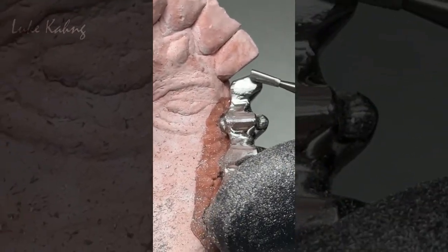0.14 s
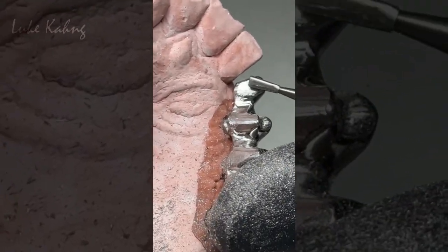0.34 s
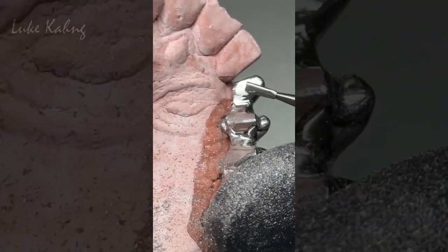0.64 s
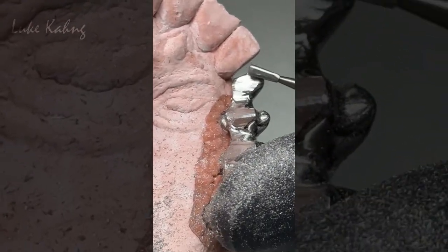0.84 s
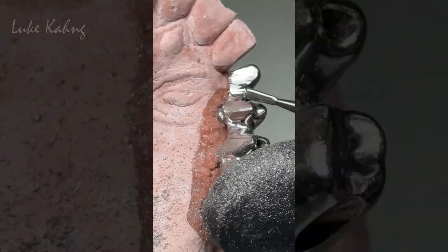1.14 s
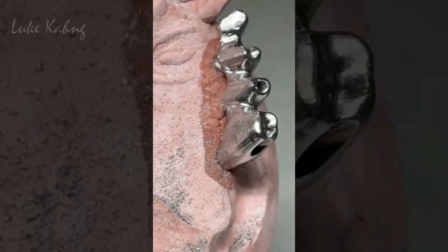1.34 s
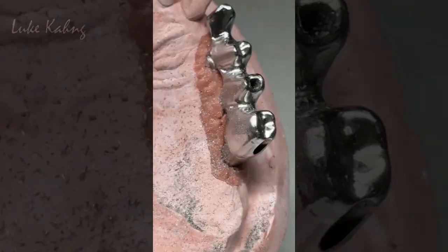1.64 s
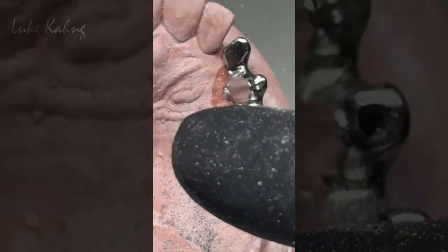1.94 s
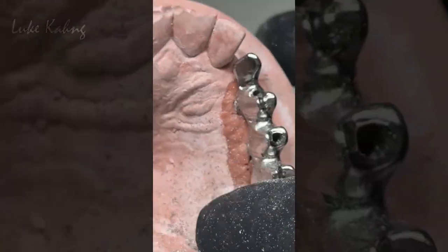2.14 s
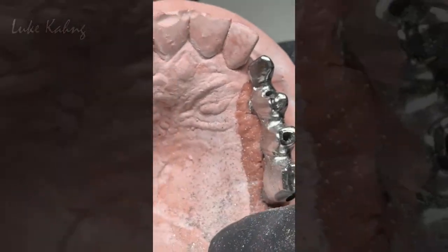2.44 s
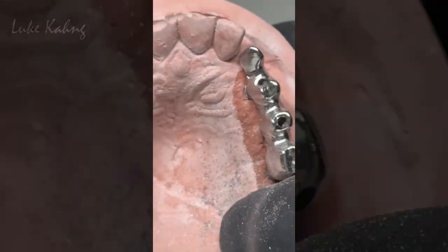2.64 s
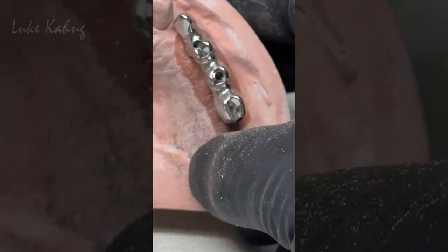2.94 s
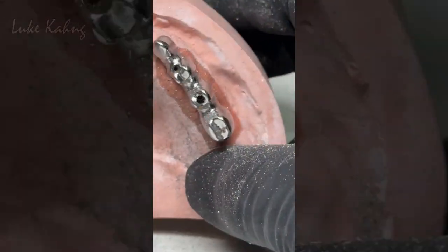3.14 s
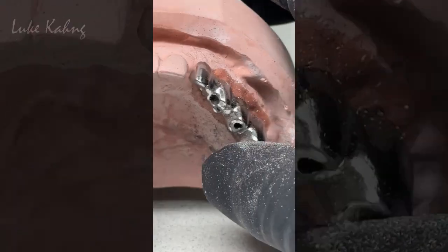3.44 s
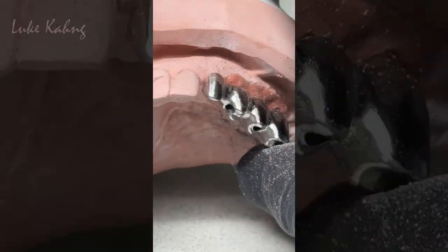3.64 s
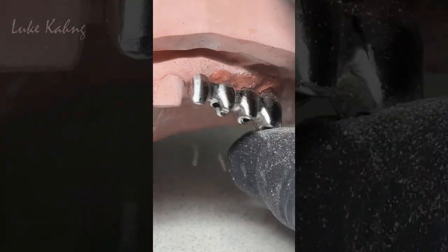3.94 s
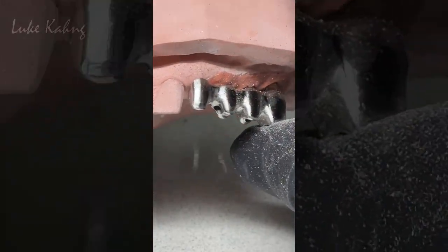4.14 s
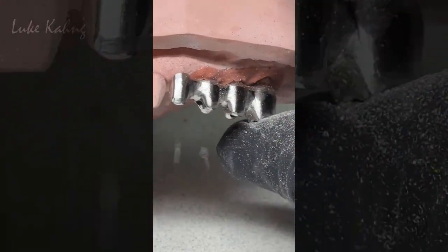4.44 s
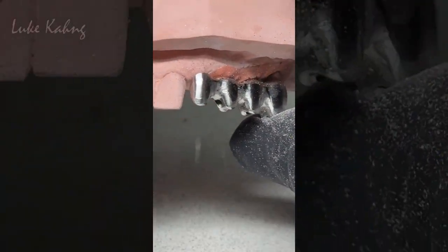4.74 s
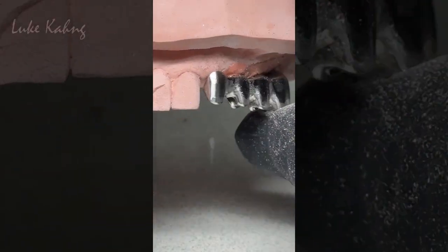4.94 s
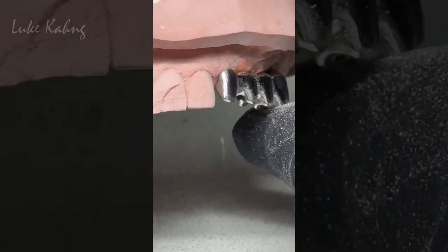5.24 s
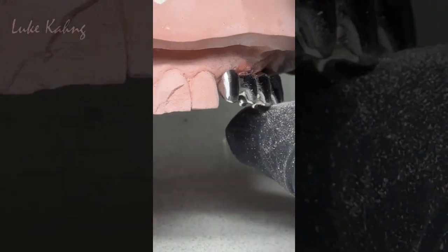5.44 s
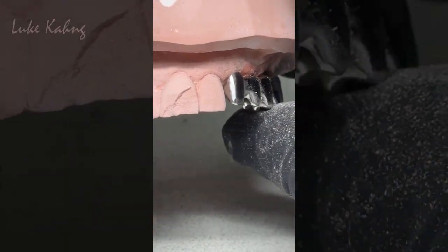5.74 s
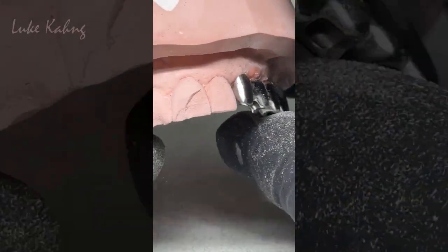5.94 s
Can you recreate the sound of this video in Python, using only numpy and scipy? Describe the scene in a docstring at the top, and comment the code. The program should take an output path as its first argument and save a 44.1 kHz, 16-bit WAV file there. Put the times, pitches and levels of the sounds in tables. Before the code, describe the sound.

Close stereo pickup at a dental lab bench with little echo. A tiny spinning burr scours a metal bar in two short spells, shrill and hissing, with chatter and small squeaks, bearings whining between them. The motor then coasts down. A plaster cast is turned over: a loud low clattering thump, soft rubbing, a lighter crunchy knock and later a barely heard bump. Dust suction roars and hisses throughout.

```python
"""A small rotary handpiece grinds a metal bar on a plaster cast in two short spells, then winds down.
Place: a dental lab bench. Random grains, tied to the burr's turning, excite moving metal resonances.
The cast is turned over: it rubs, and each bump rings the modes of bench and plaster.
The bench's dust extractor draws air all the while: noise with a set spectrum and duct and hood resonances.
Close distance; microphone with a left and a right port and a limiter."""
import sys
import numpy as np
from scipy import signal
from scipy.fft import rfft, irfft
from scipy.io import wavfile
from scipy.ndimage import uniform_filter1d, minimum_filter1d

SR = 44100
rng = np.random.default_rng(int(sys.argv[2]) if len(sys.argv) > 2 else 0)


def int16_out(signal):
    """Quantize to a 16-bit WAV file."""
    q = np.round(np.clip(np.atleast_2d(signal).T, -1, 1) * 32767)
    wavfile.write(sys.argv[1], SR, q.astype(np.int16))


N = 268569
TIME = np.arange(N) / SR
FREQ = np.maximum(np.arange(N // 2 + 1) * SR / N, 1)
SIDES = np.array([[1], [-1]])  # left port, right port


def from_db(db):
    """Decibels to gain."""
    return 10 ** (np.asarray(db) / 20)


def rms_one(x):
    """Scale to unit rms."""
    return x / np.sqrt(np.mean(x ** 2) + 1e-20)


def in_time(rows):
    """Each column of a curve at every sample."""
    s, *columns = np.transpose(rows)
    return [np.interp(TIME, s, c) for c in columns]


def coloured(x, spectrum, resonances=()):
    """Give x a smooth spectrum with peaks and dips on it; rms 1."""
    hz, db = np.transpose(spectrum)
    shape = np.interp(np.log(FREQ), np.log(hz), db)
    for centre, width, boost in resonances:
        shape = shape + boost / (1 + (2 * (FREQ - centre) / width) ** 2)
    return rms_one(irfft(rfft(x) * from_db(shape), N))


def drift(rate, size=16384):
    """Random wavering up to about rate times a second; spread 1."""
    hz = np.arange(size // 2 + 1) * SR / N
    slow = irfft(rfft(rng.standard_normal(size)) / (1 + (hz / rate) ** 2))
    return np.interp(TIME, np.arange(size) * N / SR / size, rms_one(slow))


def low_pass(x, hz, order=2):
    """Causal low-pass."""
    sos = signal.butter(order, min(hz, .45 * SR), fs=SR, output="sos")
    return signal.sosfilt(sos, x + 1e-18)


def ring(force, modes):
    """Decaying sines set off by a force; neighbouring modes swing in opposite senses."""
    out = np.zeros(N)
    for k, (hz, db, t60) in enumerate(modes):
        r, w = from_db(-60 / (t60 * SR)), 2 * np.pi * hz / SR
        mode = signal.lfilter([0, np.sin(w)], [1, -2 * r * np.cos(w), r * r], force + 1e-18)
        out += (-1) ** k * from_db(db) * mode
    return out


def touch(start, end, rise_s, fall_s):
    """Contact that closes over rise_s up to the start and dies away after the end."""
    return np.clip((TIME - start) / rise_s + 1, 0, 1) * np.exp(-np.maximum(TIME - end, 0) / fall_s)


# set spectrum of the steady suction noise, with a gap near 12 kHz: f/Hz, level/dB per Hz
SUCTION_NOISE_SPECTRUM = [(20, -22), (40, -17), (60, 1.5), (200, -4), (420, 1.15), (630, 1.5), (780, -11),
                          (1150, -17), (2700, -10), (5300, -14), (7000, -32), (9000, -28), (12000, -64.5),
                          (15500, -31.5)]
# peaks and dips of its duct and hood: f/Hz, width/Hz, level/dB
HOOD_RESONANCES = [(77.5, 3.8, -2), (105.3, 9.4, -17), (126.3, 18, 6.5), (183.7, 23, 8.5), (295, 197, -3),
                   (332.6, 13.4, 11), (492.6, 38, 9), (577, 98, 7.5), (899, 54, 6), (1903, 590, 4.5),
                   (2180, 240, -8), (2434, 21, 6), (2760, 50, 7), (3335, 310, 3), (3660, 120, -9.5),
                   (4400, 79, -4.5), (4610, 47, -8.5), (5196, 64, 5.5), (5800, 66, -3), (6170, 130, -0.5),
                   (6770, 70, 11.5)]
# hand and cast in the air stream colour the hiss, differently in each hold:
# start t/s, end t/s, f/Hz, width/Hz, level/dB
HELD_POSITIONS = [(0, 1.5, 1050, 120, -6.5), (0, 2.9, 1420, 90, 4), (1.85, 2.7, 3250, 350, 2),
                  (1.85, 2.9, 4960, 300, 1), (1.85, 6.09, 4270, 200, -4), (3, 6.09, 1393, 50, 8),
                  (3, 6.09, 1820, 54.6, 4.5)]
# swell of the hiss: t/s, level/dB
HISS_LEVEL = [(0, 2.1), (1.4, 2.5), (3.0, 0.5), (6.1, 3.5)]
# set spectrum of the noise that differs between the ports: f/Hz, level/dB per Hz
WIDE_NOISE_SPECTRUM = [(60, -79.5), (250, 6.5), (520, 25), (900, 17.5), (1150, 7), (1380, 34.5),
                       (1800, -13), (4700, -102), (5500, 8.5), (8000, 5.5), (10800, -47), (12300, -48),
                       (13700, -2), (16000, -64)]
SUCTION_DB = -28.5


def extractor():
    """Turbulent air in a resonant duct, its roar slightly right; the hiss swells, sinks and changes colour."""
    air = coloured(rng.standard_normal(N), SUCTION_NOISE_SPECTRUM, HOOD_RESONANCES)
    for start, end, hz, width_hz, db in HELD_POSITIONS:
        band = signal.lfilter(*signal.iirpeak(hz, hz / width_hz, fs=SR), air)
        air = air + (from_db(db) - 1) * touch(start, end, rise_s=0.18, fall_s=.15) * band
    roar = irfft(rfft(air) / (1 + (FREQ / 1200) ** 6), N)
    hiss = (air - roar) * from_db(in_time(HISS_LEVEL)[0] + 0.55 * drift(24))
    wide = coloured(rng.standard_normal(N), WIDE_NOISE_SPECTRUM) * SIDES  # opposite in sign at the two ports
    return from_db(SUCTION_DB) * (roar * from_db(-.35 * SIDES) + hiss + from_db(-13.5) * wide)


# the cast slides and turns under the fingers: start t/s, end t/s, level/dB
CAST_SLIDES = [(1.36, 1.48, -34), (2.585, 2.737, -31), (3.028, 3.195, -39.5), (3.422, 3.513, -40),
               (4.495, 6.09, -38.5)]
# its rub through the bench: f/Hz, level/dB per Hz
RUB_SPECTRUM = [(50, -27), (120, -3.5), (230, -5), (330, -1), (440, 1.5), (700, -22), (2000, -42.5)]
SLIDE_RISE_S, SLIDE_FALL_S = 0.11, 0.11
# it rubs faintly from the moment it is picked up (s, dB)
PICKED_UP_S, GRIP_DB = 1.1, -45


def cast_rub():
    """Plaster rubs under the fingers: unsteady noise heard through the bench, stronger in each slide."""
    rub = coloured(rng.standard_normal(N) * from_db(2.0 * drift(23)), RUB_SPECTRUM)
    sliding = sum(from_db(db) * touch(start, end, SLIDE_RISE_S, SLIDE_FALL_S) for start, end, db in CAST_SLIDES)
    gripping = from_db(GRIP_DB) * (TIME > PICKED_UP_S)
    return np.hypot(sliding, gripping) * rub


# the cast lands and rocks on the bench: t/s, push level/dB, contact hardness f/Hz, tick level/dB,
# share pressed down by the hand (0-1)
CAST_LANDINGS = [(1.315, -18, 385, -72, 0.2), (1.3467, -19.5, 279, -70, 0.3), (1.5391, 2, 267, -9, 0.4),
                 (1.552, 5, 155, -25, 0.56), (1.5756, 6.5, 107, -30, 0.6), (1.5887, -2, 332, -13.5, 0),
                 (1.6184, -12, 433, -33, 0.3), (1.6352, 9.5, 80, -42, 0), (2.6684, -17.5, 620, -38, .98),
                 (2.6745, -2, 129, -45, .74), (2.6825, -9.5, 222, -45, 0.4), (2.691, -5.5, 158, -45, 0.5),
                 (2.7001, -17, 212, -26.5, 0.5), (2.772, -18, 200, -72, .3), (3.8457, -16, 144, -70, 0),
                 (3.867, -12.5, 113, -70, 0)]
# modes of the bench top: f/Hz, level/dB, t60/s
BENCH_MODES = [(104, -26.5, .136), (135, -22.5, .139), (167.6, -21.5, 0.2), (227.5, -10.5, 0.34),
               (269.6, 4.5, .107), (291.5, 10.5, 0.052), (358, 0, 0.23), (440.4, 5, 0.094),
               (408, 10.5, 0.012), (597, -9, 0.083), (767, -9, 0.087), (928, -6, 0.065), (1080, -15, .15)]
# modes of the plaster cast: f/Hz, level/dB, t60/s
CAST_MODES = [(1710, -16, 0.081), (2060, -11, 0.069), (2160, -18, .026), (2530, -5, 0.012),
              (2870, -3, 0.024), (3180, -15, .012), (4960, -18, .016), (5940, -19, .024)]
# crumbling plaster: f/Hz, level/dB per Hz
CRUNCH_SPECTRUM = [(300, -7.5), (900, -1), (2200, 5.5), (3200, -6), (4500, -20), (9000, -33), (16000, -55)]
# longest ring of the bench while a hand presses the cast down; decay of the crumbling to 1/e
HELD_T60_S, CRUNCH_DECAY_S = 0.067, 0.015


def bumps():
    """Each contact pushes the bench top into a boom; its tick rings the cast and crunches plaster grains."""
    free_push, held_push, tick = np.zeros((3, N))
    for s, db, hardness_hz, tick_db, held in CAST_LANDINGS:
        click = np.zeros(N)
        click[round(s * SR)] = 1
        push = from_db(db) * low_pass(click, hardness_hz)
        held = np.clip(held, 0, 1)
        free_push += (1 - held) * push
        held_push += held * push
        tick += from_db(tick_db) * click
    damped = [(hz, db, min(t60, HELD_T60_S)) for hz, db, t60 in BENCH_MODES]
    boom = ring(free_push, BENCH_MODES) + ring(held_push, damped)
    # the bench is too small to radiate deep bass
    boom = signal.sosfilt(signal.butter(2, 85, "high", fs=SR, output="sos"), boom)
    clack = low_pass(ring(tick, CAST_MODES), 6000)
    # plaster grains go on crumbling for a few milliseconds after a tick
    crumbling = signal.lfilter([1], [1, -np.exp(-1 / (CRUNCH_DECAY_S * SR))], tick + 1e-18)
    crunch = from_db(-12.0) * crumbling * coloured(rng.standard_normal(N), CRUNCH_SPECTRUM)
    return boom + clack + crunch


# share of the pressure that is given up before the burr lifts
EASED_SHARE = 0.86


def pressure(start, end, press_s, ease_s):
    """Hand pressure through one grind, 0 to 1: it rises, holds and eases off."""
    easing = np.clip((TIME - end) / ease_s + 1, 0, 1)
    return np.clip((TIME - start) / press_s, 0, 1) * (1 - EASED_SHARE * easing)


# free speed (turns per s); corner of its slow response to a change of load (Hz)
FREE_HZ, INERTIA_HZ = 669, 5
# wavering of the speed, free and at full pressure (turns per s)
WAVER_HZ, PRESSED_WAVER_HZ = .45, .6
# the motor is switched off (s) and falls to half speed within COAST_S
MOTOR_OFF_S, COAST_S = 1.186, .27


def spindle(load_hz, pressed):
    """Angle of the burr: it slows and wavers under load, recovers, and coasts down once switched off."""
    coasting = 1 + (np.maximum(TIME - MOTOR_OFF_S, 0) / COAST_S) ** 2
    speed = (FREE_HZ - low_pass(load_hz, INERTIA_HZ, order=1)) / coasting
    waver = WAVER_HZ + (PRESSED_WAVER_HZ - WAVER_HZ) * pressed
    return 2 * np.pi * np.cumsum(speed + waver * drift(31.5)) / SR


def tone(angle, orders, rough, flutter_hz):
    """Multiples of a rotation, each trembling in strength and phase."""
    out = np.zeros(N)
    for multiple, db in orders:
        tremble = 1 + rough * (drift(flutter_hz) + 1j * drift(flutter_hz))
        phase = multiple * angle + rng.uniform(0, 2 * np.pi)
        out += from_db(db) * np.real(tremble * np.exp(1j * phase))
    return out * np.sqrt(2 / (1 + 2 * rough ** 2))


def grit(angle, bite, judder_db):
    """Abrasive grains cut at random, hardest once a turn, in uneven bursts of a few milliseconds."""
    grains = rng.uniform(-1.3, 1, N) * (rng.random(N) < .4)
    judder = np.clip(drift(200), -2, 2)
    return rms_one(grains * np.exp(bite * np.cos(angle)) * from_db(judder_db * judder))


def struck_metal(x, centre_hz, width_hz, count=256):
    """A metal resonance whose pitch follows centre_hz; the level is kept even."""
    hz, s, frames = signal.stft(x, SR, nperseg=count)
    detune = (hz[:, None] - np.interp(s, TIME, centre_hz)) / (width_hz / 2)
    y = signal.istft(frames / np.sqrt(1 + detune ** 2), SR)[1][:N]
    return y / np.sqrt(uniform_filter1d(y ** 2, size=1200) + 1e-12)


# free-running bearing whine: multiple of the speed, level/dB
WHINE_ORDERS = [(3, -49), (4.08, -51), (7.8, -49), (8.57, -49.5), (9, -51.5), (26, -58)]
WHINE_END_S = 1.295  # the whine starts to fade


def bearing_whine(angle):
    """Bearings whine at multiples of the turning speed, gliding down with it before they fade."""
    return tone(angle, WHINE_ORDERS, rough=.35, flutter_hz=16) * touch(0, WHINE_END_S, rise_s=.01, fall_s=.028)


# the shank squeals along: multiple of the speed, level/dB
SQUEAL_ORDERS = [(3, -8), (8, 3), (10, -6.5), (11, -15), (12, 4), (13, -9), (14, -14), (22, -14), (23, -10)]


def shank_squeal(angle):
    """The shank squeals at trembling multiples of the turning speed."""
    return tone(angle, SQUEAL_ORDERS, rough=.25, flutter_hz=45)


# set spectrum of the bright hiss under the grinding, with a gap near 10-12 kHz: f/Hz, level/dB per Hz
BRIGHT_HISS_SPECTRUM = [(5000, -34), (7200, 8), (8000, 11), (9100, 18.5), (9700, -25), (10800, -34),
                        (12300, -21), (14000, 18.5), (15100, 14), (16000, -5)]
# peaks and dips of the burr's shank: f/Hz, width/Hz, level/dB
SHANK_RESONANCES = [(7100, 400, -3), (8440, 170, -5), (14400, 300, -6), (15150, 300, 8)]


def bright_hiss(angle):
    """Grains cut at random, hardest once a turn, give a bright hiss, a little different at each port."""
    spray = grit(angle, bite=0.58, judder_db=0.5) + 0.2 * SIDES * rng.standard_normal(N)
    return coloured(spray, BRIGHT_HISS_SPECTRUM, SHANK_RESONANCES)


# grit on metal: f/Hz, level/dB per Hz
GRIT_SPECTRUM = [(1000, -27), (2000, -8.5), (3200, -4.5), (4000, -11.5), (4900, -4.5), (5400, -0.5),
                 (6000, -8), (6600, -3.5), (7100, -16), (9000, -50)]


def scouring(angle, centre_hz):
    """Grains scour the bar and excite its broad contact resonance."""
    grains = coloured(grit(angle, bite=0.85, judder_db=-0.5), GRIT_SPECTRUM)
    return struck_metal(grains, centre_hz + 150 * drift(25), width_hz=2400)


# how often the burr catches, how far the ring strays and how wide it is (Hz), level against the scouring (dB)
CATCHES_PER_S, CATCH_WANDER_HZ, CATCH_WIDTH_HZ, CATCH_DB = 28, 420, 140, -6.5


def catches(angle, centre_hz):
    """The burr catches and lets go: a narrow ring of the bar jumps about and comes in spurts."""
    ring_hz = centre_hz + CATCH_WANDER_HZ * drift(CATCHES_PER_S)
    ringing = struck_metal(grit(angle, bite=1.0, judder_db=11), ring_hz, CATCH_WIDTH_HZ)
    return ringing * from_db(CATCH_DB + 3 * np.clip(drift(CATCHES_PER_S), -2, 1.5))


# one strike a turn: multiple of the speed, level/dB
STRIKE_ORDERS = [(3, -5), (4, -7), (5, 2.5), (6, 1), (7, -2.5), (8, -6), (9, -9)]


def turn_strikes(angle):
    """The burr strikes the bar once a turn: trembling multiples of the turning speed."""
    return tone(angle, STRIKE_ORDERS, rough=.27, flutter_hz=50)


# the burr starts to bounce once a turn, builds up and breaks off:
# start t/s, end t/s, final level/dB, resonance f/Hz
CHATTER_BOUTS = [(0.034, .081, -24, 3570), (0.1, .125, -33, 3500), (0.152, .175, -28, 3700),
                 (.347, 0.373, -32, 4000), (.514, .55, -32.5, 3400), (.808, 0.839, -25, 3370),
                 (0.874, 0.984, -26.5, 3500), (.993, 1.022, -21, 4610), (1.04, 1.053, -28, 3580)]
CHATTER_GROWTH_DB = 10.5
# uneven bouncing: spread of strength (dB) and of the resonance (Hz), and how often they change (per s)
CHATTER_SPREAD_DB, CHATTER_WANDER_HZ, CHATTER_CHANGES_PER_S = 1.8, 160, 35


def chatter(strikes):
    """Bouts of hard once-a-turn strikes that grow unevenly and break off."""
    level = np.zeros(N)
    for start, end, db, _ in CHATTER_BOUTS:
        to_go = np.clip((end - TIME) / (end - start), 0, 1)
        level += from_db(db - CHATTER_GROWTH_DB * to_go) * touch(start, end, rise_s=0.0049, fall_s=0.006)
    centre_hz, = in_time([(s, hz) for start, end, _, hz in CHATTER_BOUTS for s in (start, end)])
    centre_hz = centre_hz + CHATTER_WANDER_HZ * drift(CHATTER_CHANGES_PER_S)
    uneven = from_db(CHATTER_SPREAD_DB * np.clip(drift(CHATTER_CHANGES_PER_S), -2, 1))
    return level * uneven * struck_metal(strikes, centre_hz, width_hz=990)


# the burr skips every second turn: start t/s, end t/s, level/dB
SKIP_SPELLS = [(0.095, 0.103, -30), (0.193, 0.219, -26), (0.535, 0.538, -24.5)]
# tone of the skipping: multiple of the speed, level/dB
SKIP_ORDERS = [(5.5, -8), (6.5, -5), (7.5, 0), (8.5, -12)]


def skips(angle):
    """The burr loses its grip and skips every second turn: tones halfway between the speed's multiples."""
    skipping = sum(from_db(db) * touch(start, end, rise_s=0.012, fall_s=0.0085) for start, end, db in SKIP_SPELLS)
    return skipping * tone(angle, SKIP_ORDERS, rough=0.4, flutter_hz=45)


# the burr squeaks as it slides over an edge: start t/s, end t/s, first f/Hz, last f/Hz, level/dB
EDGE_SQUEAKS = [(.39, .425, 5600, 5450, -33), (.452, .492, 4980, 4730, -30.5),
                (.972, 1.012, 4950, 4800, -32.5), (1.03, 1.053, 4480, 4020, -27.5)]
# strands of a squeak: multiple of its pitch, level/dB
STRANDS = [(.83, -7), (1, 0), (1.14, -8)]
SQUEAK_WOBBLE_HZ = 30


def squeaks():
    """The burr loses its grip and slides with a wobbling, falling squeak of several strands."""
    level, pitch_points = np.zeros(N), []
    for start, end, first_hz, last_hz, db in EDGE_SQUEAKS:
        level += from_db(db) * touch(start, end, rise_s=.005, fall_s=0.0043)
        pitch_points += [(start, first_hz), (end, last_hz)]
    pitch_hz, = in_time(pitch_points)
    glide = 2 * np.pi * np.cumsum(pitch_hz + SQUEAK_WOBBLE_HZ * drift(90)) / SR
    return level * tone(glide, STRANDS, rough=.3, flutter_hz=90)


# the burr is pressed onto the bar, harder and harder, held, then eased off: start t/s, end t/s,
# time to full pressure t/s, easing time t/s, scouring level/dB (reached only at OVERPRESSED),
# squeal level/dB at full pressure, further sag at full pressure/turns per s
GRIND_SPELLS = [(.03, .55, 0.392, 0.083, -23.5, -31, 1.366), (.799, 1.054, 0.145, 0.012, -25.5, -33.5, 5.2)]
# drag of a touching burr (turns per s)
DRAG_HZ = 5.3
# from no pressure to full the layers grow by (dB) and the contact resonance climbs (Hz)
SCOUR_SWING_DB, BRIGHT_SWING_DB, SQUEAL_SWING_DB = 8, 6.5, 14
LIGHT_HZ, PRESSED_HZ = 4030, 4970
# pressure, full = 1, to which the scouring and bright hiss levels refer; the hand stays below it
OVERPRESSED = 1.5
# bright hiss at OVERPRESSED; once-a-turn strikes against the scouring
BRIGHT_DB, STRIKES_DB = -28.5, -11


def handpiece():
    """Pressure makes the burr scour, hiss and squeal louder and slows it; bearings whine as it turns."""
    pressed, load_hz, scour_gain, bright_gain, squeal_gain = np.zeros((5, N))
    for start, end, press_s, ease_s, scour_db, squeal_db, sag_hz in GRIND_SPELLS:
        touching = touch(start, end, rise_s=.004, fall_s=.005)
        force = pressure(start, end, press_s, ease_s)
        pressed += touching * force
        load_hz += touching * (DRAG_HZ + sag_hz * force)
        scour_gain += touching * from_db(scour_db + SCOUR_SWING_DB * (force - OVERPRESSED))
        bright_gain += touching * from_db(BRIGHT_DB + BRIGHT_SWING_DB * (force - OVERPRESSED))
        squeal_gain += touching * from_db(squeal_db + SQUEAL_SWING_DB * (force - 1))
    angle = spindle(load_hz, pressed)
    centre_hz = LIGHT_HZ + (PRESSED_HZ - LIGHT_HZ) * pressed
    strikes = turn_strikes(angle)
    rattle = from_db(STRIKES_DB) * struck_metal(strikes, centre_hz, width_hz=1300)
    cutting = scour_gain * (scouring(angle, centre_hz) + rattle + catches(angle, centre_hz))
    bright = bright_gain * bright_hiss(angle)
    squeal = squeal_gain * shank_squeal(angle)
    return cutting + chatter(strikes) + skips(angle) + squeaks() + bright + squeal + bearing_whine(angle)


def room(x, t60, wet_db, spread_hz):
    """Direct sound and a short diffuse tail from the work bay; its low end differs between the ports."""
    t = TIME[:SR // 2]
    mid, side = rng.standard_normal((2, len(t))) * from_db(-60 * t / t60) * (t > .003)
    tails = (mid + low_pass(side, spread_hz) * SIDES) / np.linalg.norm(mid)
    return x + from_db(wet_db) * signal.fftconvolve(np.atleast_2d(x), tails, axes=1)[:, :N]


# delay between the ports, and the frequency above which it applies
PORT_LAG_S, PORT_SPLIT_HZ = 4.3e-5, 7020


def ports(x):
    """The treble reaches the left port a little before the right."""
    lead = np.pi * FREQ * PORT_LAG_S / (1 + (PORT_SPLIT_HZ / FREQ) ** 10)
    return irfft(rfft(x, N) * np.exp(1j * lead * SIDES), N)


def scene():
    """Extractor, cast and tool at the close microphone."""
    cast = room(bumps() + cast_rub(), t60=0.26, wet_db=-23.5, spread_hz=1000)
    tool = room(handpiece(), t60=0.056, wet_db=-21, spread_hz=330)
    return ports(extractor() + cast + tool)


def limiter(x, ceiling_db, hold_s, smooth_hz):
    """A peak over the ceiling at either port pulls the gain of both down, where it is held for a moment."""
    need_db = np.minimum(ceiling_db - 20 * np.log10(np.abs(x).max(axis=0) + 1e-9), 0)
    half = int(hold_s * SR / 2)
    # the window reaches 4 ms ahead of the peak
    held_db = minimum_filter1d(need_db, 2 * half + 1, origin=half - SR // 250)
    return x * from_db(low_pass(held_db, smooth_hz, order=1))


CUTOFF_HZ = 15850


def record(dry):
    """Limiter, full-scale clipping and a steep top cut."""
    loud = limiter(dry, ceiling_db=-.5, hold_s=.125, smooth_hz=120)
    top_cut = signal.ellip(12, .1, 80, CUTOFF_HZ, fs=SR, output="sos")
    return signal.sosfilt(top_cut, np.clip(loud, -1, 1))


dry = scene()
out = record(dry)
int16_out(out)
```